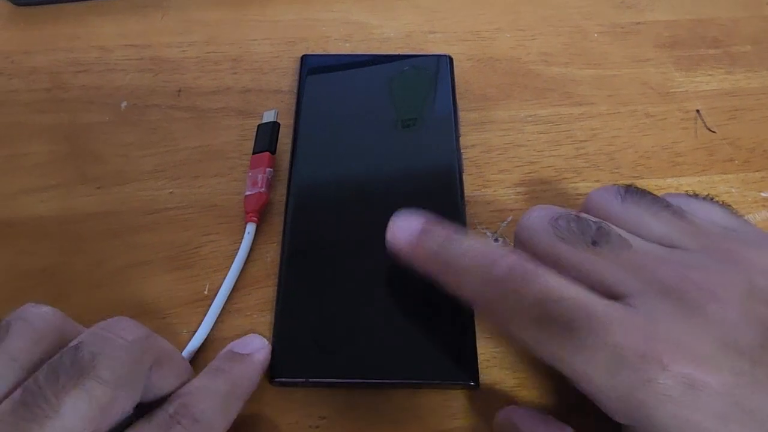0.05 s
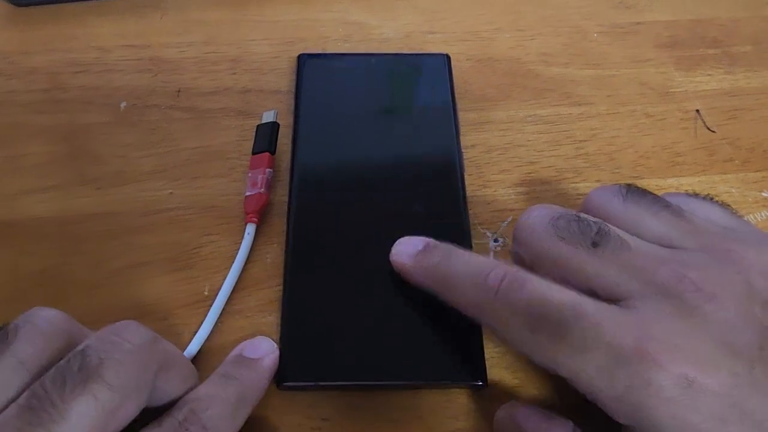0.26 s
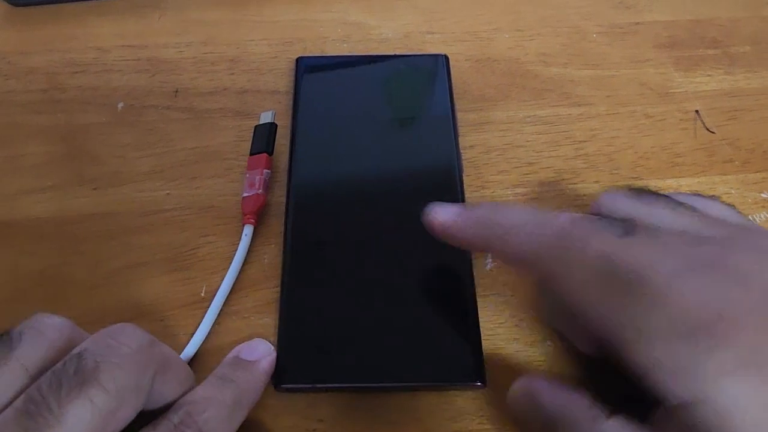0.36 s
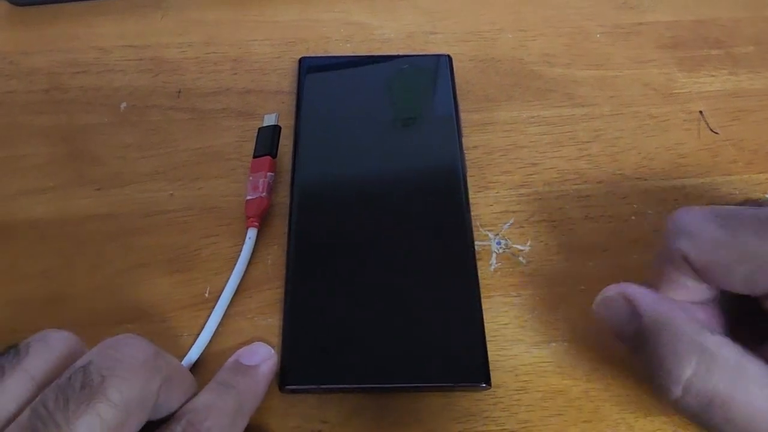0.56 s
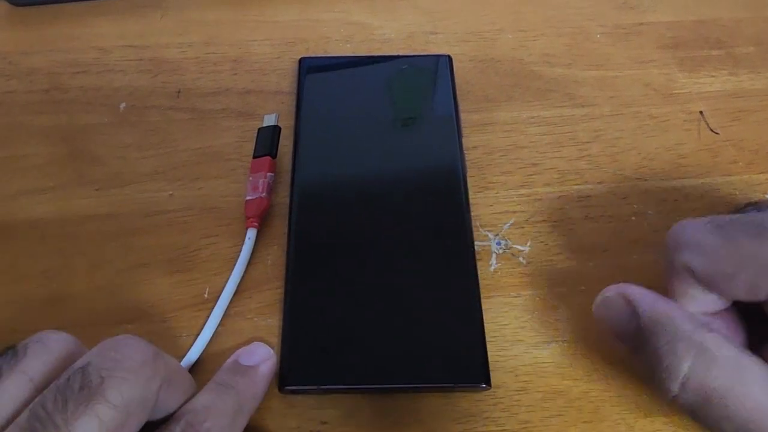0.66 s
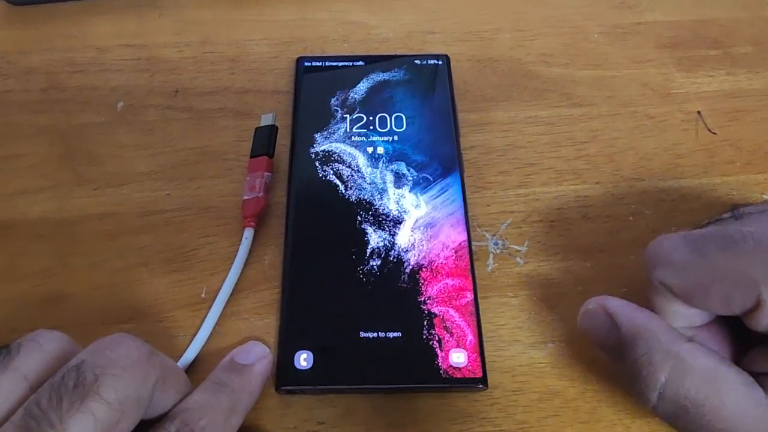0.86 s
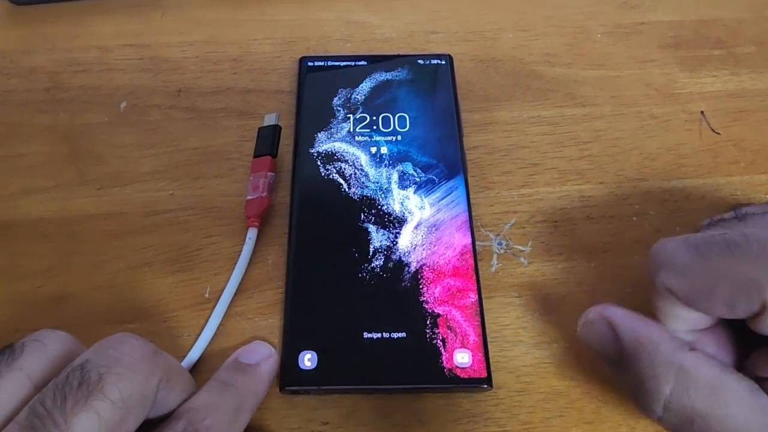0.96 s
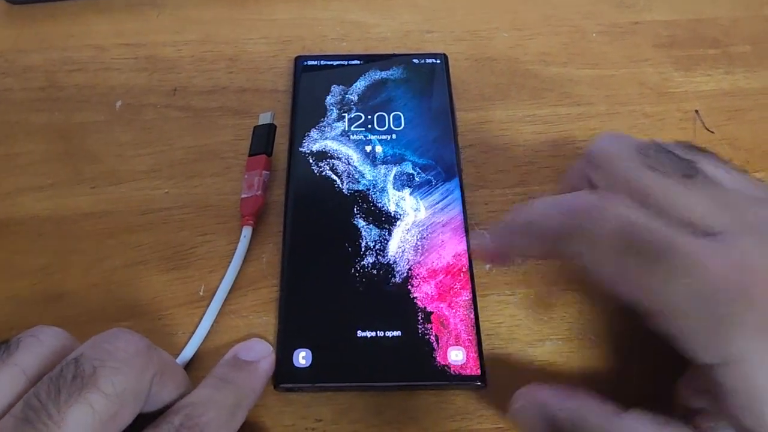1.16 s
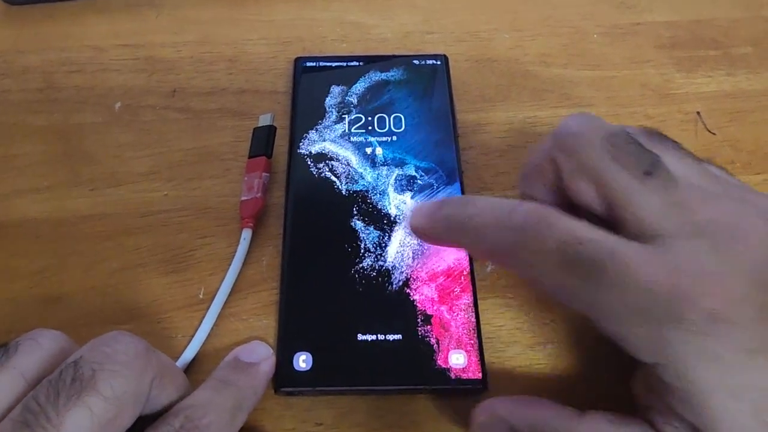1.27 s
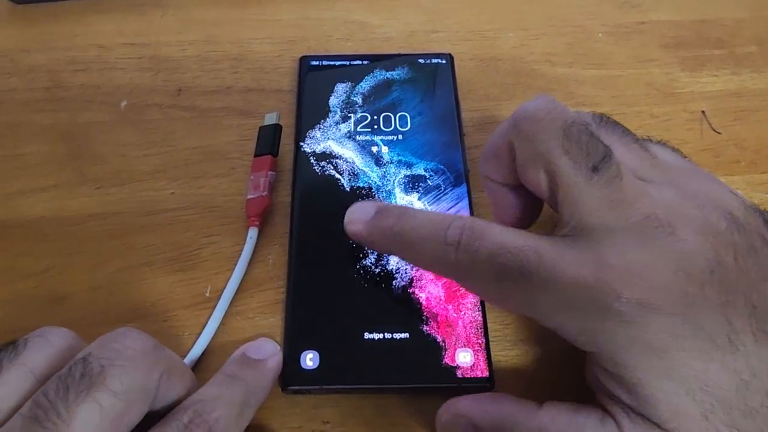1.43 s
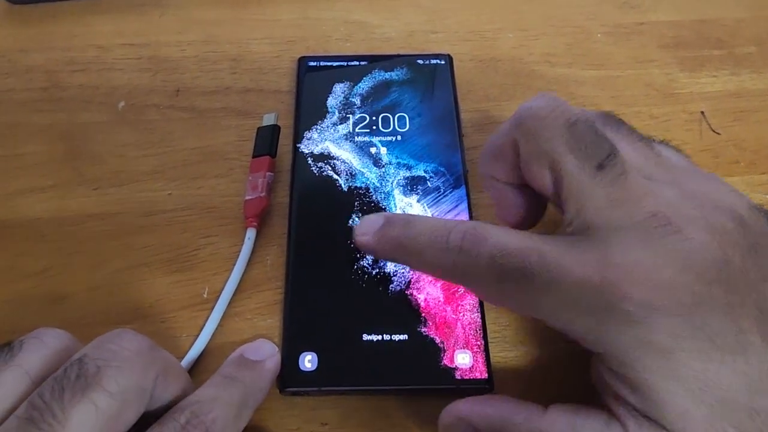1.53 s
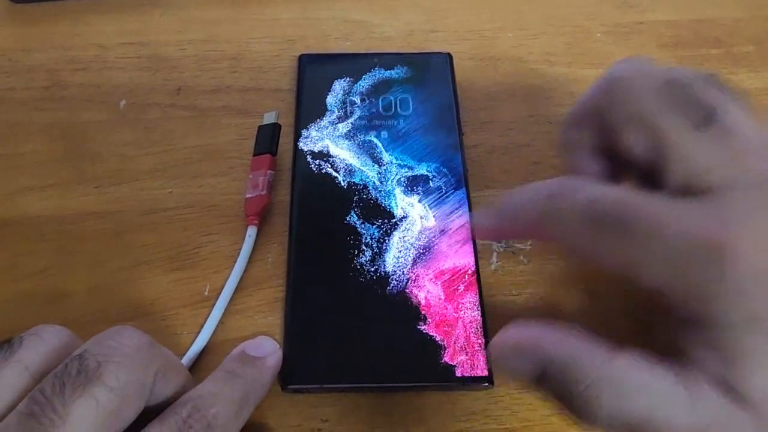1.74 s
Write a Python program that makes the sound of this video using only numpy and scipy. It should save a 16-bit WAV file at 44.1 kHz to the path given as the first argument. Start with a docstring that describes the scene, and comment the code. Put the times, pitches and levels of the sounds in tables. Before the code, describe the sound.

Two quick fingertip taps on a phone lying on a wooden table, each a sharp snap and woody knock-back, close to a stereo microphone in a small room with faint hum and hiss.

```python
"""First a steady appliance hum and faint air hiss in a small room, then two fingertip taps on a phone
that rocks on a wooden table, close to a stereo microphone, and later one thin chirp from a far bird.
Each tap: the finger lands softly, the phone snaps down on the wood, then knocks back; the table top booms.
Table and phone are sums of decaying sines, ticks and room tail are decaying noise bands,
the hum is wavering sines, the air is filtered noise and the bird is one gliding sine."""
import sys
import numpy as np
from scipy import signal
from scipy.fft import rfft, irfft
from scipy.io import wavfile
from scipy.ndimage import uniform_filter1d

SR = 44100
rng = np.random.default_rng(int(sys.argv[2]) if len(sys.argv) > 2 else 0)


def output_pcm(signal):
    """Save a mono or channel-first signal as 16-bit PCM at the path in sys.argv[1].

    Samples are clipped to [-1, 1] before scaling.
    """
    pcm = np.clip(np.atleast_2d(signal).T, -1, 1) * 32767
    wavfile.write(sys.argv[1], SR, np.round(pcm).astype(np.int16))


N = 79380
T = np.arange(N) / SR
HALF = SR // 2  # length of every ring, burst and room tail [samples]


def undb(db):
    """Convert dB to amplitude gain."""
    return 10 ** (np.asarray(db, float) / 20)


def fade(t, t60):
    """Exponential decay, 60 dB down after t60 seconds."""
    return np.exp(-np.log(1000) * t / t60)


def walk(rate):
    """Slow random wander of spread 1: noise averaged twice over windows of 1/rate seconds."""
    window = int(SR / rate)
    wander = uniform_filter1d(uniform_filter1d(rng.standard_normal(N), window), window)
    return wander / wander.std()


def shaped(points):
    """Gain on the FFT grid from (frequency [Hz], level [dB]) points, joined along log frequency."""
    hz, db = np.array(points, float).T
    grid_hz = np.maximum(np.fft.rfftfreq(N, 1 / SR), 1)
    return undb(np.interp(np.log(grid_hz), np.log(hz), db))


# spectrum of the air hiss: (frequency [Hz], relative level [dB per Hz])
AIR_SPECTRUM = [(15, -6.5), (25, -32), (45, -10.5), (105, -17.5), (160, -7), (215, -3.5), (275, -11.5),
                (320, -15.5), (430, -19), (470, -28), (1070, -34.5), (2760, -41.5), (6560, -42.5),
                (7510, -34.5), (10700, -50), (12200, -44.5), (14800, -38), (16000, -51)]
# stereo width of the hiss: (frequency [Hz], side minus mid [dB])
AIR_WIDTH = [(60, -16), (110, -28), (200, -7), (380, -3), (700, -3), (1290, 1.5), (2380, -1), (4400, -0.5),
             (8120, 1.5), (15000, -1)]
# balance of the hiss: (frequency [Hz], left minus right [dB])
AIR_BALANCE = [(60, 11), (110, -6), (200, 5.5), (380, 2.0), (700, 0), (1290, 0.5), (2380, 2.0),
               (4400, -1.5), (8120, 1.5), (15000, 1.5)]
AIR_DB = -61  # rms of the mid signal, before the balance


def air():
    """Room and microphone noise: shaped random mid and side, narrow in the bass, wide in the treble."""
    mid, side = rfft(rng.standard_normal((2, N))) * shaped(AIR_SPECTRUM)
    side = side * shaped(AIR_WIDTH)
    lean = np.sqrt(shaped(AIR_BALANCE))  # half the balance on each channel
    gain = undb(AIR_DB) / irfft(mid, N).std()
    left, right = (mid + side) * lean, (mid - side) / lean
    return gain * irfft(np.array([left, right]), N)


# centre pitch of each appliance tone: (frequency [Hz])
HUM_PITCHES = (59.2, 119.3, 161.5, 248.2, 409)
# one row per tone: (centre level [dB rms], level waver spread [dB], pitch waver spread [Hz])
HUM_TONES = [(-61.5, 2.1, 0.3), (-67.5, 5, 0.37), (-66.5, -2.5, 0.95), (-57.5, 0.5, 0.76), (-80.5, 3, 2.2)]


def hum():
    """Appliance behind the table: steady sines that each waver in level and pitch."""
    out = np.zeros(N)
    for hz, (db, waver_db, waver_hz) in zip(HUM_PITCHES, HUM_TONES):
        level = np.sqrt(2) * undb(db + waver_db * walk(9.7))  # rms to peak
        turns = np.cumsum(hz + waver_hz * walk(13.3)) / SR
        out += level * np.sin(2 * np.pi * (turns + rng.random()))
    return out


CHIRP_S, CHIRP_LEN_S = .838, .11  # start, length
CHIRP_DB = -78  # peak level before the envelope
CHIRP_HZ, CHIRP_TOP_SHARE = 7340, .4  # highest pitch, and the share of the chirp where it comes
CHIRP_SAG_HZ = 1600  # pitch drop per squared share of the chirp away from the top


def bird():
    """One thin far whistle: a sine whose pitch arches while its level throbs slightly and sinks."""
    share = np.clip((T - CHIRP_S) / CHIRP_LEN_S, 0, 1)
    hz = CHIRP_HZ - CHIRP_SAG_HZ * (share - CHIRP_TOP_SHARE) ** 2
    ends = np.minimum(1, 10 * np.minimum(share, 1 - share))  # a tenth in, a tenth out
    throb = undb(1.5 * walk(60) - 6.0 * share)
    return undb(CHIRP_DB) * ends * throb * np.sin(2 * np.pi * np.cumsum(hz) / SR)


# room tail, one row per octave band: (centre [Hz], relative level [dB], t60 [s], side share [0-1])
ROOM_BANDS = [(320, -3, 0.368, .4), (601, -0.5, 0.3, .7), (1173, -6.5, 0.39, 1), (2400, 1, 0.29, 1),
              (4760, -2, 0.2, .7), (8900, -8.5, 0.48, 1)]
ROOM_RISE_S = 0.002


def room(x):
    """Dense reflections of the small room: decaying noise in octave bands, narrowest in the lowest."""
    t, tail = T[:HALF], 0
    for hz, db, t60, side_share in ROOM_BANDS:
        band = signal.butter(2, [hz / np.sqrt(2), hz * np.sqrt(2)], "bandpass", fs=SR, output="sos")
        mid, side = signal.sosfilt(band, rng.standard_normal((2, HALF)))
        stereo = mid + side_share * np.array([[1], [-1]]) * side
        env = fade(t, t60) * (1 - np.exp(-t / ROOM_RISE_S))
        env = env / np.sqrt(np.sum(env ** 2))  # equal energy before the band level
        tail = tail + undb(db) * env * stereo
    return signal.fftconvolve(tail, x.mean(0)[None], axes=1)[:, :N]


def ring(modes, rise, flip=-1):
    """Decaying sines swelling in over `rise` cycles; flip -1 puts neighbours in opposite phase."""
    t, out = T[:HALF], 0
    for k, (hz, db, t60) in enumerate(modes):
        gain = flip ** k * undb(db + rng.standard_normal())  # each mode strays about 1 dB
        swell = 1 - np.exp(-t * hz / rise)
        out = out + gain * np.sin(2 * np.pi * hz * t) * fade(t, t60) * swell
    return out


def push(x, ms):
    """Smooth by the length of the contact: a longer contact excites less treble."""
    force = np.hanning(int(ms * SR / 1000) + 3)
    return np.convolve(x, force / force.sum())[:len(x)]


def burst(edges_hz, t60):
    """Short decaying noise band, different at the two microphone ports."""
    sos = signal.butter(2, edges_hz, "bandpass", fs=SR, output="sos")
    return signal.sosfilt(sos, rng.standard_normal((2, HALF)) * fade(T[:HALF], t60))


# lowest table modes, moving together: (frequency [Hz])
BOOM_PITCHES = (62, 85, 110, 128, 145, 158.5)
# one row per boom mode: (relative level [dB], t60 [s])
BOOM_MODES = [(-26, 0.066), (-16, 0.089), (-7, 0.24), (0.5, .1), (5.5, 0.14), (1.5, 0.44)]
# upper table modes: (frequency [Hz], relative level [dB], t60 [s])
TABLE_MODES = [(254.5, -13.5, 0.33), (297.3, -10, 0.11), (362.7, -11, 0.2), (429.6, -11.5, 0.18),
               (570.5, -20.5, 0.21), (578, -17, 0.11), (664.6, -20.5, 0.3), (775.5, -17.5, 0.11),
               (954, -6.5, 0.076)]


def wood(boom_db, upper_db, table_db, contact_ms):
    """Table top: low modes boom in one phase, upper modes alternate; the contact length dulls both."""
    low = []
    for hz, (db, t60) in zip(BOOM_PITCHES, BOOM_MODES):
        extra_db = upper_db if hz == BOOM_PITCHES[-1] else 0
        low.append((hz, db + extra_db, t60))
    boom = undb(boom_db) * ring(low, rise=0.57, flip=1)
    return push(boom + undb(table_db) * ring(TABLE_MODES, rise=1.0), contact_ms)


BODY_CONTACT_MS = 0.1  # for snap and knock
# phone body: (frequency [Hz], relative level [dB], t60 [s])
PHONE_MODES = [(1499, -3, 0.025), (1633, 2.5, 0.015), (1782, -2, .012), (2027, -5.5, 0.0087),
               (2477, -15, 0.032), (2905, -10, .015), (3490, -18, 0.028), (4340, -17, 0.02),
               (4900, -22, 0.012)]


def snap(db):
    """Phone body modes, rung when the glass snaps down flat."""
    return -undb(db) * push(ring(PHONE_MODES, rise=1.6, flip=1), BODY_CONTACT_MS)


# edge of the phone on wood: (frequency [Hz], relative level [dB], t60 [s])
EDGE_MODES = [(550, -16.5, 0.012), (793, -2.5, 0.015), (981, 1, 0.013), (1545, -9, .012), (1903, -9, 0.013),
              (2690, -17.5, 0.011)]


def knock(db):
    """Modes of the phone's edge on wood, rung when it knocks back."""
    return -undb(db) * push(ring(EDGE_MODES, rise=.35, flip=0.99), BODY_CONTACT_MS)


TICK_BAND_HZ, TICK_T60_S = [2200, 6140], .025
CRACK_BAND_HZ, CRACK_T60_S = [4500, 9700], 0.0046


def tick(tick_db, crack_db):
    """Contact noise: a tick and a shorter, brighter crack."""
    return undb(tick_db) * burst(TICK_BAND_HZ, TICK_T60_S) + undb(crack_db) * burst(CRACK_BAND_HZ, CRACK_T60_S)


# contacts of finger, phone and table, levels as drive into each part: (time [s], boom [dB],
# extra on the highest boom mode [dB], upper table [dB], table contact [ms], snap [dB], knock [dB],
# tick [dB], crack [dB], left minus right of all but the wood [dB])
CONTACTS = [(0.1957, -65, -2, -70, 8.2, -91, -68, -56, -45, 2),
            (0.1974, -39.5, -6, -41, 3.0, -64, -57, -79, -76, 8),
            (0.2215, -33.5, 0, -30.5, 0.61, -21, -28, -29.5, -75, 5),
            (0.2593, -34.5, 4, -27, 0.52, -48, -21.5, -36, -60, 4.5),
            (0.2640, -79, -23, -48, 1.06, -54, -56, -35.5, -71, -9.5),
            (0.3346, -44, -6, -50, 1, -67, -69, -61, -46.5, 1),
            (0.362, -32, -8, -32, 0.57, -19.5, -30.5, -39, -68, 2),
            (0.3690, -45, 5.5, -29.5, 1.8, -39, -34, -38.5, -60, -4),
            (0.3982, -35, 3.5, -25, 0.65, -58, -23, -35, -77, 5),
            (0.402, -81, -20, -63, 0.8, -38.5, -44, -42.5, -62, -20)]
PORT_LAG_MS, BOOM_LATE_MS = .1, 0.76  # snap at the right port, wood at both
LOW_CUT_HZ = 45


def taps():
    """Each contact booms in the table, rings the phone and ticks; the snap reaches the left port first."""
    out = np.zeros((2, N + SR))
    lag, late = int(PORT_LAG_MS * SR / 1000), int(BOOM_LATE_MS * SR / 1000)
    for s, boom_db, upper_db, table_db, ms, snap_db, knock_db, tick_db, crack_db, pan_db in CONTACTS:
        start = int(s * SR)
        lean = undb(np.array([[pan_db], [-pan_db]]) / 2)
        out[:, start + late:start + late + HALF] += wood(boom_db, upper_db, table_db, ms)
        out[:, start:start + HALF] += (tick(tick_db, crack_db) + knock(knock_db)) * lean
        glass = snap(snap_db)
        out[0, start:start + HALF] += glass * lean[0]
        out[1, start + lag:start + lag + HALF] += glass * lean[1]
    low_cut = signal.butter(2, LOW_CUT_HZ, "highpass", fs=SR, output="sos")
    return signal.sosfilt(low_cut, out[:, :N])


def scene():
    """Close taps with their room over the air, the hum and the far bird."""
    near = taps()
    return air() + hum() + bird() + room(near) + near


TOP_HZ = 15800


def record(dry):
    """The recorder cuts the top with a steep low-pass."""
    return signal.sosfilt(signal.ellip(10, .2, 70, TOP_HZ, fs=SR, output="sos"), dry)


dry = scene()
out = record(dry)
output_pcm(out)
```